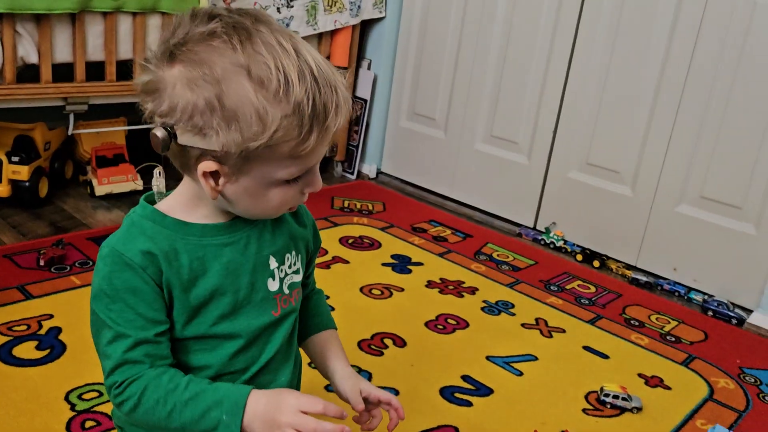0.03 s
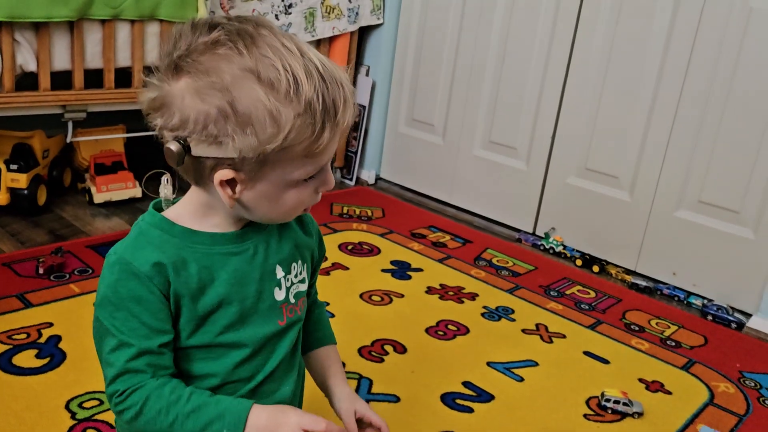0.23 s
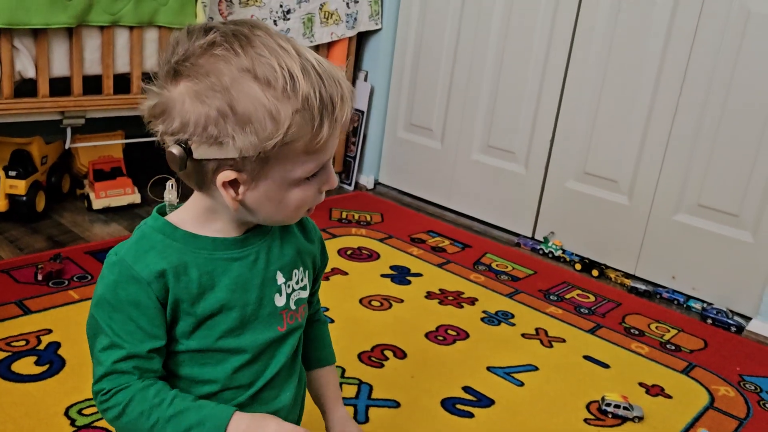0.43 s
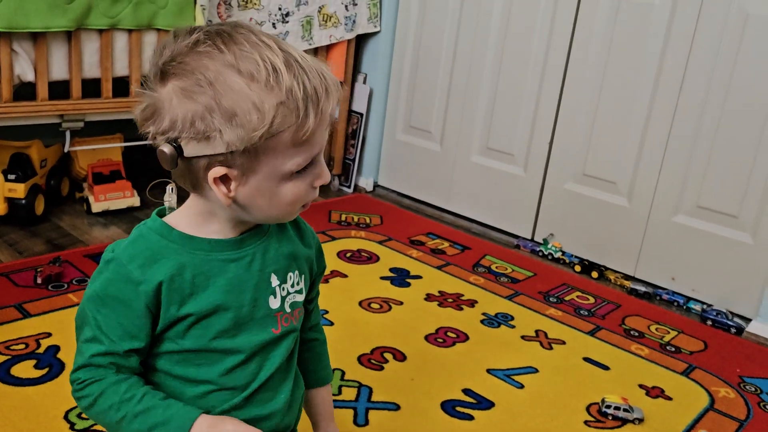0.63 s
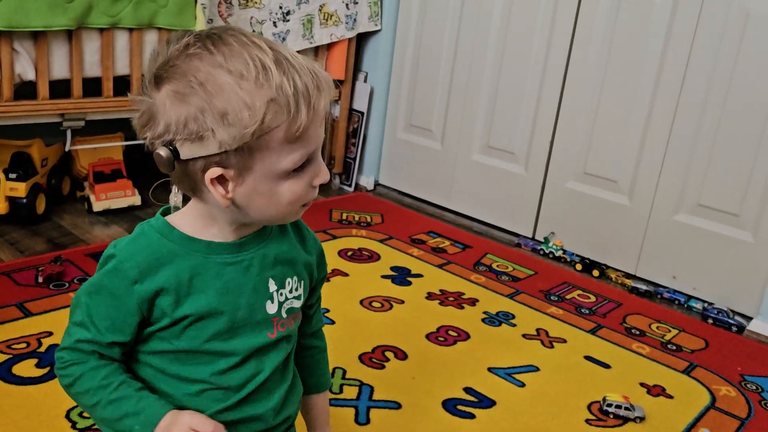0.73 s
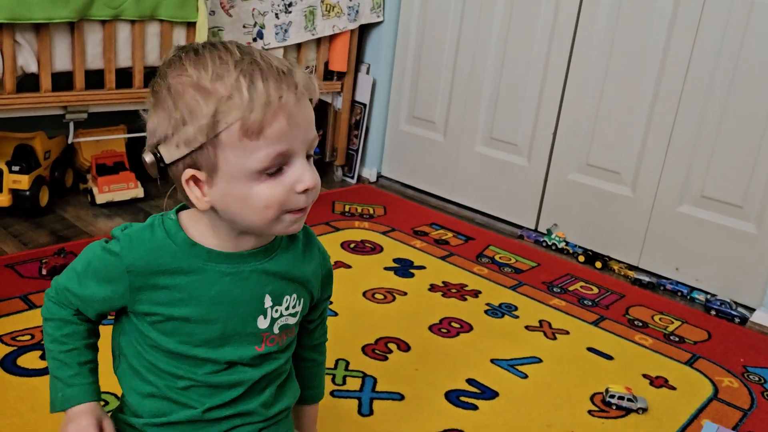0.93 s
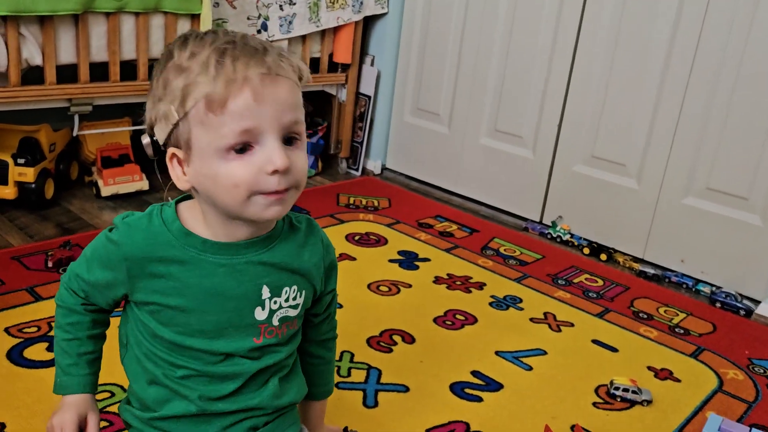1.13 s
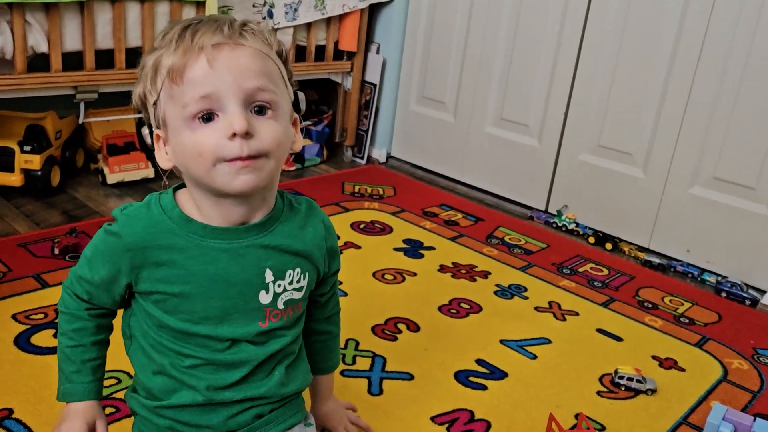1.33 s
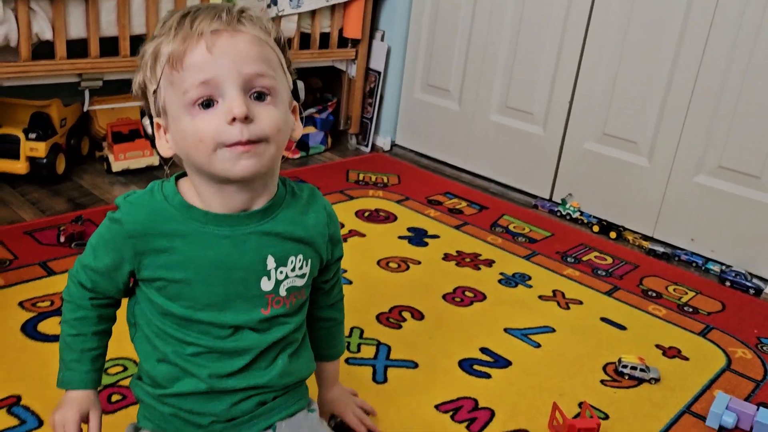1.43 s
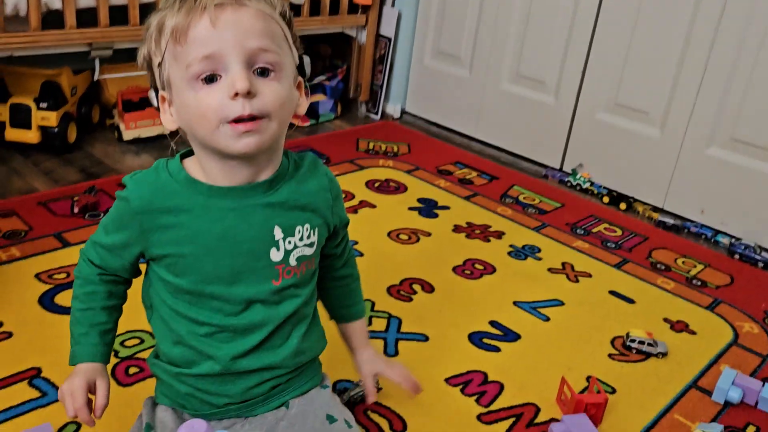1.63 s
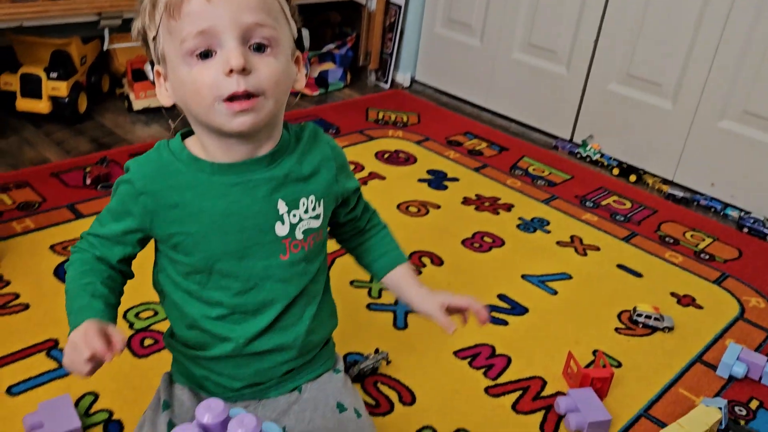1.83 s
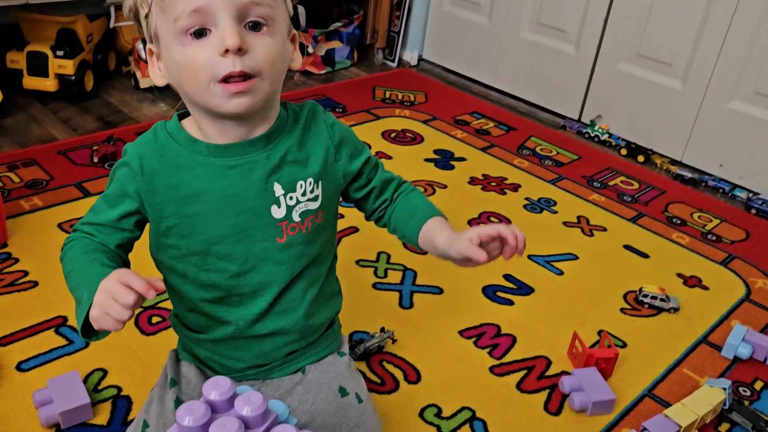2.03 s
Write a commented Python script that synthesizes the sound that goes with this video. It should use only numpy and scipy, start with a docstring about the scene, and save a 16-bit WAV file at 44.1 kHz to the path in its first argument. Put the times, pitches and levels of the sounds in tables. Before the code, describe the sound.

Big plastic blocks tumble onto each other and the carpet, then faint clothes rustle.

```python
"""Toy blocks toppling onto carpet

Large hollow plastic blocks fall onto each other and a carpeted floor, close by.
Each blow clacks, rings the block and thumps the floor; a small room's ceiling and walls throw it back.
A dull household drone remains, with a soft rustle of clothes and a few tiny ticks."""
import sys
import numpy as np
from scipy import signal
from scipy.fft import rfft, irfft
from scipy.io import wavfile
from scipy.ndimage import map_coordinates

SR = 44100
rng = np.random.default_rng(int(sys.argv[2]) if len(sys.argv) > 2 else 0)


def put_to_file(sound):
    """Save the sound as 16-bit audio at rate SR, in the file named by the first command-line argument."""
    columns = np.atleast_2d(sound).T  # one column per channel
    safe = np.clip(columns, -1, 1)
    whole_steps = np.round(safe * 32767)
    wavfile.write(sys.argv[1], SR, whole_steps.astype(np.int16))


N = 91331
HZ = np.fft.rfftfreq(2 ** 17, 1 / SR)  # the frequencies every filter is drawn on
T = np.arange(SR * 3 // 4) / SR  # seconds since the start of one short sound


def amp(db):
    """Turn decibels into a gain."""
    return 10 ** (np.asarray(db) / 20)


def unit(x):
    """Scale x to an average (rms) level of 1."""
    return x / np.sqrt(np.mean(x ** 2) + 1e-20)


def along(points, hz=HZ):
    """Join (frequency, value) points on a log-frequency axis."""
    freqs, values = np.transpose(points)
    return np.interp(np.log(hz + 1), np.log(freqs + 1), values)


def curve(points):
    """A gain for every sample, from (time, level) points."""
    return amp(np.interp(np.arange(N) / SR, *np.transpose(points)))


def bump(hz, octaves):
    """A bell shape around one frequency."""
    return np.exp(-.5 * (np.log2((HZ + 1) / hz) / octaves) ** 2)


def above(hz):
    """A gentle filter that weakens everything below hz."""
    return 1j * HZ / (hz + 1j * HZ)


def causal(db):
    """A filter with these gains that never rings before the sound arrives."""
    cepstrum = irfft(db * np.log(10) / 20)
    cepstrum[1:len(cepstrum) // 2] *= 2
    cepstrum[len(cepstrum) // 2:] = 0
    return np.exp(rfft(cepstrum))


def filtered(x, response):
    """Give each frequency in x its own gain."""
    return irfft(rfft(x, 2 * len(HZ) - 2) * response)[..., :x.shape[-1]]


def lean(x, balance):
    """Tilt stereo sound by (frequency, left minus right) points."""
    return filtered(x, amp(along(balance) * np.array([[.5], [-.5]])))


def add(track, start_s, x):
    """Mix x into the track."""
    part = track[..., round(start_s * SR):][..., :x.shape[-1]]
    part += x[..., :part.shape[-1]]


def dying(x, fade_s):
    """Fade x by 60 dB every fade_s seconds, then scale it to energy 1."""
    x = x * 1000 ** (-T / fade_s)
    return x / np.linalg.norm(x, axis=-1, keepdims=True)


# How alike left and right are in the room (frequency [Hz], likeness [1 = the same])
LIKENESS = [(100, 0.35), (250, 1), (600, 0.46), (1050, 0.29), (1500, 0.44), (3000, -0.17), (15000, 0.49)]


def room_noise(size):
    """Stereo noise as a room carries it: most alike on both sides in the bass."""
    likeness = along(LIKENESS, np.fft.rfftfreq(size, 1 / SR))
    angle = np.arccos(np.clip(likeness, -1, 1)) / 2
    white = rfft(rng.standard_normal((2, size)))
    mid, side = irfft(white * [np.cos(angle), np.sin(angle)], size)
    return np.array([mid + side, mid - side])


def steady_noise(tone_db):
    """Room noise with the given tone, at level 1."""
    return unit(filtered(room_noise(N), amp(tone_db)))


# Tone of the drone (frequency [Hz], level [dB])
DRONE_TONE = [(18, -45.5), (30, -26.5), (49, -16.5), (129, -19.5), (156, -9.5), (184, -18.5), (282, -3.5),
              (408, -11.5), (439, 1), (491, -13.5), (779, -6), (1170, -17), (1520, -28), (1660, -20),
              (2500, -36.5), (3250, -50.5), (5500, -120)]
# Its resonances (frequency [Hz], width [Hz], boost [dB])
DRONE_PEAKS = [(295, 180, 6), (435, 15, 2), (778, 360, 3), (1484, 120, 19)]
# Its loudness (time [s], level [dB])
DRONE_LEVEL = [(0, -67), (.3, -54), (.68, -45.5), (.76, -58.5), (.83, -51.5), (1.03, -54), (1.15, -51.5),
               (1.39, -53.5), (1.44, -50), (1.52, -50.5), (1.67, -51), (1.72, -50), (1.89, -47.5),
               (1.94, -55.5), (2, -47.5)]


def household_drone(waver_db=1.5, wavers_per_s=14):
    """Dull noise with a few resonances; its level wavers at random."""
    peaks = sum(db / (1 + (2 * (HZ - hz) / width) ** 2) for hz, width, db in DRONE_PEAKS)
    drone = steady_noise(along(DRONE_TONE) + peaks) * curve(DRONE_LEVEL)
    waver = map_coordinates(rng.standard_normal(80), [np.arange(N) * wavers_per_s / SR], mode="wrap")
    return drone * amp(waver_db * waver)


# Tone of the hiss (frequency [Hz], level [dB])
HISS_TONE = [(1180, -25), (2000, -0.5), (2640, -2), (3340, -10.5), (4340, -6), (6820, -9), (13600, -11),
             (16000, -26.5)]


def hiss(level_db=-79.5):
    """A faint, even hiss."""
    return amp(level_db) * steady_noise(along(HISS_TONE))


# Tone of the rumble (frequency [Hz], level [dB])
RUMBLE_TONE = [(30, -22), (90, 8), (230, -3), (400, -20), (1000, -33)]
# Its loudness (time [s], level [dB])
RUMBLE_LEVEL = [(0, -46.5), (.015, -43), (.04, -52.5), (.3, -55), (.7, -75.5)]


def rumble():
    """A low rumble, strongest at the start."""
    return steady_noise(along(RUMBLE_TONE)) * curve(RUMBLE_LEVEL)


# Tone of rustling cloth (frequency [Hz], level [dB])
RUSTLE_TONE = [(1500, -12.5), (2800, -1), (4500, -4.5), (5600, -5), (7000, 2.5), (8300, -9), (9600, -9),
               (12000, -7.5), (16000, -13)]
# Its loudness (time [s], level [dB])
RUSTLE_LEVEL = [(.8, -87.5), (.95, -73), (1.03, -82), (1.25, -78.5), (1.47, -68.5), (1.59, -67),
                (1.67, -76.5), (1.82, -71.5), (1.93, -74), (2.07, -73.5)]


def clothes_rustle():
    """Clothes rustle softly as someone moves."""
    return steady_noise(along(RUSTLE_TONE)) * curve(RUSTLE_LEVEL)


# Tiny ticks (time [s], level [dB], pitch [Hz], width [octaves], fade time [s])
TICKS = [(.752, -69, 6000, .9, .15), (1.453, -55, 4000, 1, .025), (1.714, -63, 7800, .2, .04),
         (1.787, -65, 9000, .4, .06), (1.802, -50, 1800, .35, .02), (1.840, -46, 3100, .35, .009)]


def ticks():
    """Small things tick as someone moves: each is a quickly fading band of noise."""
    out = np.zeros((2, N))
    for start_s, db, hz, octaves, fade_s in TICKS:
        band = unit(filtered(room_noise(len(T)), bump(hz, octaves)))
        add(out, start_s, amp(db) * band * 1000 ** (-T / fade_s))
    return out


# Stereo balance of the quiet sounds (frequency [Hz], left minus right [dB])
QUIET_BALANCE = [(60, 5.5), (120, -1), (240, -2.5), (480, 0), (950, 2), (1890, 6), (3770, 15), (7520, 4),
                 (15000, 8.0)]


def background():
    """All the quiet sounds, leaning mostly to the left."""
    return lean(household_drone() + hiss() + rumble() + clothes_rustle() + ticks(), QUIET_BALANCE)


def straight_path(click, dull_hz, direct_db=-1.5, scatter_db=-3.5):
    """The direct sound, plus treble scattered by things near the floor; both dulled above dull_hz."""
    scatter = filtered(dying(room_noise(len(T)), fade_s=.042), above(1000))
    low_pass = 1 / (1 + 1j * np.sqrt(2) * HZ / dull_hz - (HZ / dull_hz) ** 2)
    return filtered(amp(direct_db) * click + amp(scatter_db) * scatter, low_pass)


# How long the room rings (frequency [Hz], fade time [s])
ROOM_FADE = [(100, 0.94), (400, 0.48), (1500, 0.46), (4000, 0.48), (15000, 0.47)]


def room_tail(swell, level_db=-12):
    """The room's soft afterglow, in which the bass lasts longest."""
    hz, t, spectrum = signal.stft(room_noise(len(T)), SR, nperseg=256)
    fade = 1000 ** (-t / along(ROOM_FADE, hz)[:, None])
    tail = swell * signal.istft(spectrum * fade, nperseg=256)[1][:len(T)].reshape(2, -1)[:, :len(T)]
    return amp(level_db) * tail / np.linalg.norm(tail[0])


# Echoes off the ceiling and a wall (delay [s], level [dB])
ECHOES = [(.0086, -4), (0.0166, -7.5)]


def room(dull_hz, echo_db, right_lead_s=.00021, swell_s=.0093):
    """How a click on the floor reaches us: the near sound with its first echoes, and the tail."""
    pulse = 1. * (np.arange(len(T)) == SR // 2000)
    click = filtered(pulse, np.exp(1j * np.pi * HZ * right_lead_s * np.array([[-1], [1]])))
    near = straight_path(click, dull_hz)
    for delay_s, db in ECHOES:
        smeared = click + amp(-3) * dying(room_noise(len(T)), fade_s=.014)
        add(near, delay_s, amp(db + echo_db) * filtered(smeared, above(730)))  # echoes lack bass
    swell = 1 - np.exp(-(T / swell_s) ** 2)
    tail = room_tail(swell)
    dense_echoes = dying(swell * room_noise(len(T)), fade_s=.15)
    return near + dense_echoes, tail


def ring(notes, vary_db=4, detune=.0044, slip_cycles=.09):
    """A struck object's fading notes, a little different in level, pitch and phase each time."""
    out = np.zeros(len(T))
    for hz, db, fade_s in notes:
        louder, sharper, ahead = rng.standard_normal(3)
        wave = np.cos(2 * np.pi * (hz * (1 + detune * sharper) * T + slip_cycles * ahead))
        out += amp(db + vary_db * louder) * dying(wave, fade_s)
    return out


# Notes of the floor's thump (pitch [Hz], level [dB], fade time [s])
FLOOR_NOTES = [(157.5, -36.5, 0.42), (201.3, -25.5, .18), (284, -28, 0.18), (312.6, -24.5, 0.14)]
# Notes of the floorboards' deep thud (pitch [Hz], level [dB], fade time [s])
BOARD_NOTES = [(58, -36.5, .4), (102, -44.5, 0.34), (120, -29.5, 0.2)]


def floor_thump(thump_db, thud_db, spread=.3033, carpet_s=.0016):
    """The floor rings, a little differently left and right; the carpet softens the start."""
    thump = ring(FLOOR_NOTES) + spread * np.array([[1], [-1]]) * ring(FLOOR_NOTES)
    thud = ring(BOARD_NOTES)
    return (amp(thump_db) * thump + amp(thud_db) * thud) * (1 - np.exp(-T / carpet_s))


# Notes of a hollow block (pitch [Hz], level [dB], fade time [s])
BLOCK_NOTES = [(338.5, -32, .09), (453.8, -25, 0.061), (529, -34.5, .09), (640, -25, .08), (900, -25, .07),
               (1084, -23, 0.076), (1489, -15.5, 0.062), (1607, -22.5, 0.1), (2172, -19, .07),
               (2360, -20.5, 0.02), (2432, -29.5, 0.024), (2584, -29, 0.078), (3270, -23, .03),
               (3897, -21, .03)]


def block_strike(buzz_db=-3.5):
    """A block clicks, buzzes briefly against what it hits, and rings."""
    click = T == 0
    buzz = filtered(dying(rng.standard_normal(len(T)), fade_s=.012), above(1200))
    return click + amp(buzz_db) * buzz + ring(BLOCK_NOTES)


# Tone of plastic being hit (frequency [Hz], level [dB])
CONTACT_TONE = [(30, -31), (60, -24), (130, -5), (250, -2), (700, 1.5), (1100, -2.5), (2400, -6),
                (4500, -6.5), (5600, -13.5), (6500, -9), (7700, -13), (8900, -22), (11000, -16.5),
                (14000, -21), (16000, -19.5)]
# Stereo balance of the blows (frequency [Hz], left minus right [dB])
BLOCK_BALANCE = [(200, -1.7), (700, 0.7), (1400, 0.5), (2500, 4), (5000, 4), (9000, 8.5), (15000, 6)]
# The blows (time [s], level [dB], floor thump [dB], deep thud [dB], hollow boom [dB], midrange [dB],
# clack [dB], clack pitch [Hz], brightness [dB], direct sound dulled above [Hz], echo boost [dB])
BLOWS = [(0.0582, 10.5, 13, -0.5, 6.5, -1.5, 13, 3800, -3, 11960, -7),
         (0.0784, 10, 3, 8, -2.5, 0, 9, 3650, 0.5, 9000, -9.5),
         (.13, -1.5, 17.5, 18, 2, -1.5, 10, 3820, -2, 4000, -3),
         (0.1558, 2.5, 3, 8, 2.5, -2, 3, 4230, 1.5, 5000, -8),
         (.196, 7, -13, -15.5, -5, 2.5, 8, 1600, 11.5, 4000, -3),
         (0.2101, 16.5, -8.5, -4, 8, -1.5, 2.5, 3850, 5, 4500, -4),
         (0.224, 5, -10, -15, 4, 2.5, 13, 2850, 4.5, 9070, -4),
         (.248, 6.5, 1, 2, 4.5, 1, 11, 2700, -2, 4000, -4.5),
         (0.2648, 1, -2.5, -2.5, -2, 1, 13, 2880, -7.5, 4000, -1),
         (0.287, -8.5, 6, -14, -6.5, -9.5, 26, 1280, -10, 3900, 0.5),
         (.332, 14.5, -3.5, -10, 6, 4.5, 3.5, 4100, -1.5, 4000, -6),
         (0.4106, -3, 9.5, 3, 11.5, 0, -3, 1460, -14, 4000, -6),
         (.4513, 9.5, 5, -7, 2, 6, 4, 3440, -2, 3300, 0),
         (.5408, 1, 12.5, -14, -1, 0, 4.5, 6500, 0, 4200, -2),
         (0.566, 3, 6, -20, -6.5, 7.5, -5.5, 2175, -10.5, 2500, -4.5),
         (.589, -7.5, 9.5, -15, 5, -14, 4, 854, -11, 1500, 3)]


def toppling_blocks(boom_hz=425, mid_hz=1973, bright_hz=5870, tail_share=.64):
    """Each blow sounds a block and the floor; its boom and clack stand out less in the room's tail."""
    out = np.zeros((2, N))
    treble = HZ ** 2 / (HZ ** 2 + bright_hz ** 2)
    for (start_s, db, thump_db, thud_db, boom_db, mid_db,
         clack_db, clack_hz, bright_db, dull_hz, echo_db) in BLOWS:
        strike = block_strike()
        tone_db = along(CONTACT_TONE) + mid_db * bump(mid_hz, octaves=.39) + bright_db * treble
        accent_db = boom_db * bump(boom_hz, octaves=.28) + clack_db * bump(clack_hz, octaves=.2)
        near, tail = room(dull_hz, echo_db)
        for path, share in (near, 1), (tail, tail_share):
            shaped = filtered(strike, causal(tone_db + share * accent_db))
            add(out, start_s, amp(db) * signal.fftconvolve(shaped[None], path, axes=1))
        add(out, start_s, amp(db) * floor_thump(thump_db, thud_db))
    return lean(out, BLOCK_BALANCE)


def scene():
    """The falling blocks over the quiet room."""
    return toppling_blocks() + background()


def record(dry, low_cut_hz=45, peak_limit=.8, top_hz=15900):
    """The recorder drops the deepest bass, rounds the tallest peaks and cuts the highest treble."""
    thinned = signal.sosfilt(signal.butter(3, low_cut_hz, "high", fs=SR, output="sos"), dry)
    rounded = thinned / (1 + (thinned / peak_limit) ** 4) ** (1 / 4)
    return filtered(rounded, 1 / np.sqrt(1 + (HZ / top_hz) ** 300))


dry = scene()
out = record(dry)
put_to_file(out)
```